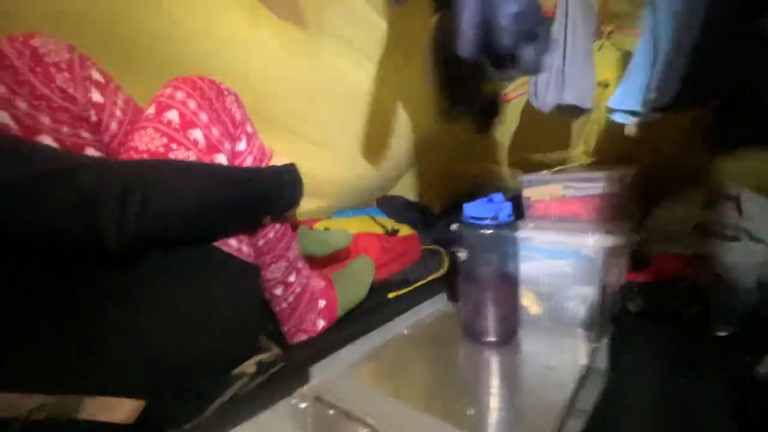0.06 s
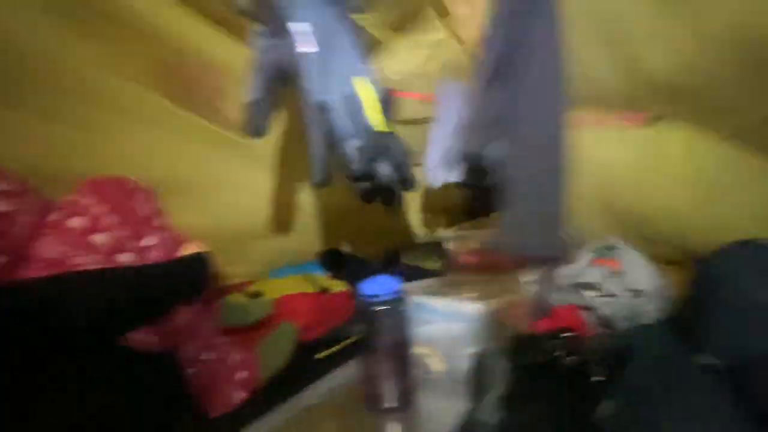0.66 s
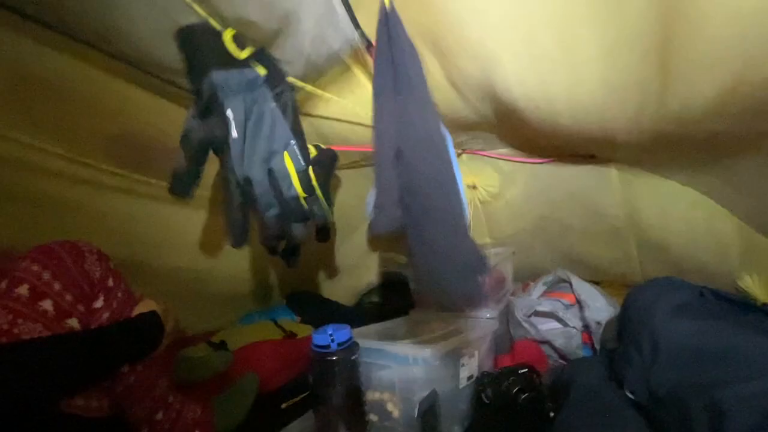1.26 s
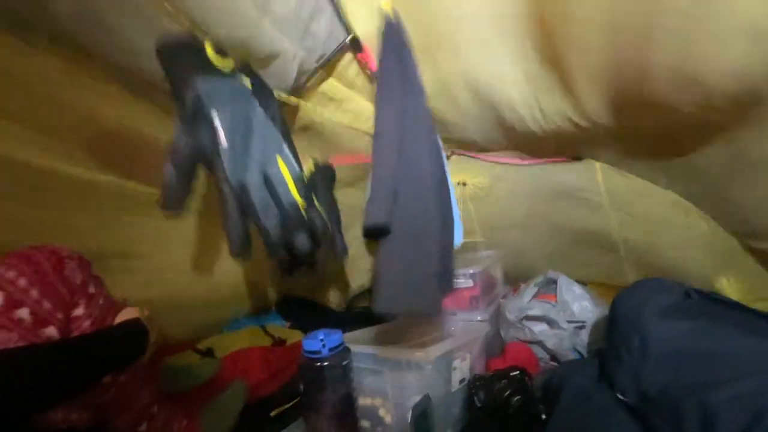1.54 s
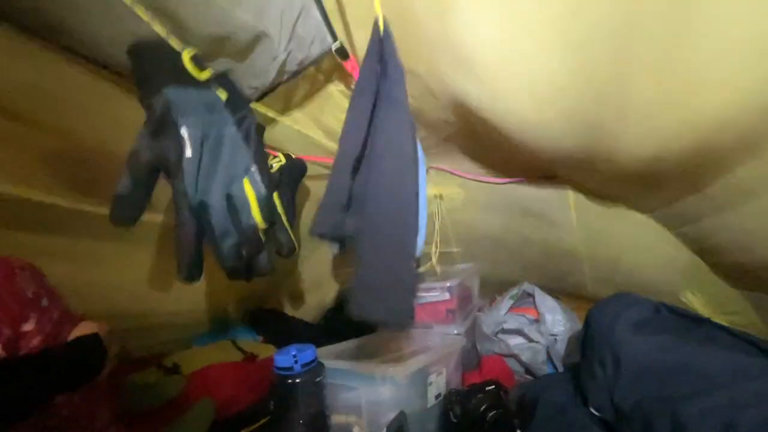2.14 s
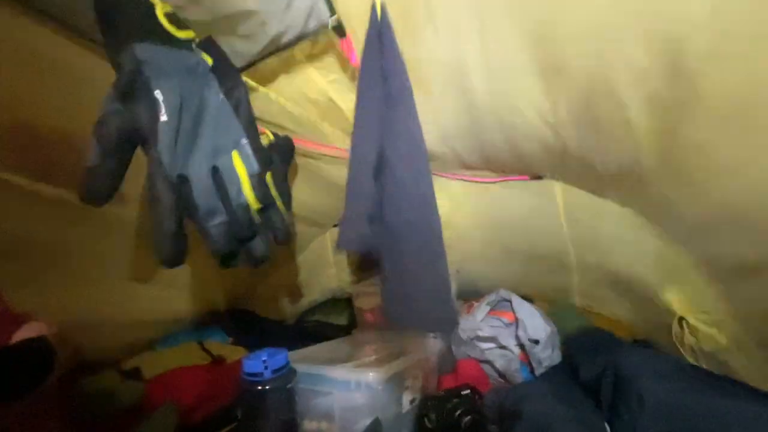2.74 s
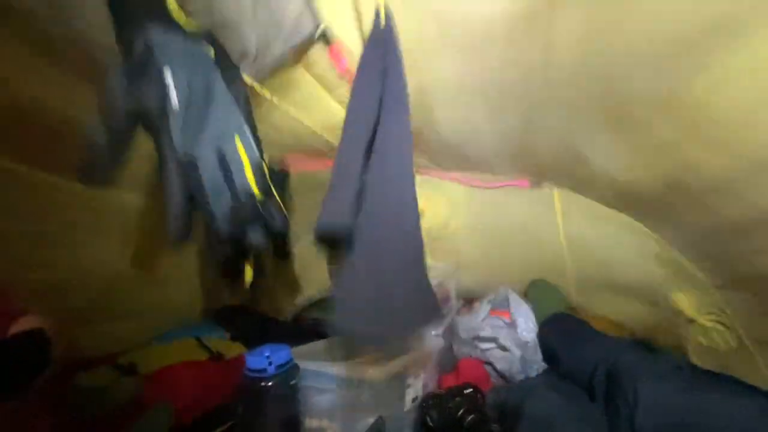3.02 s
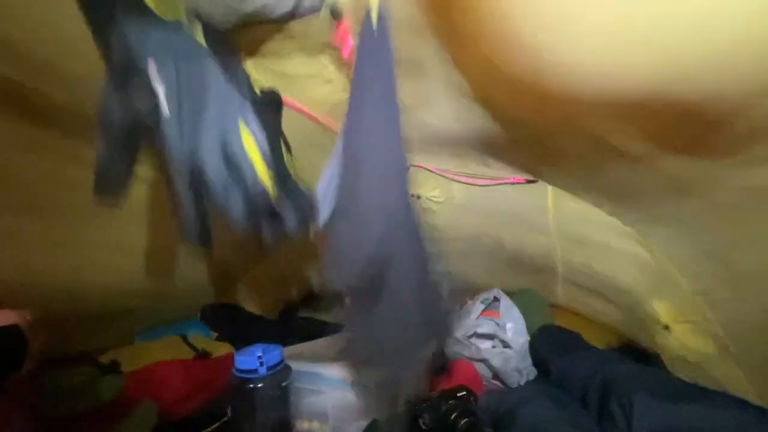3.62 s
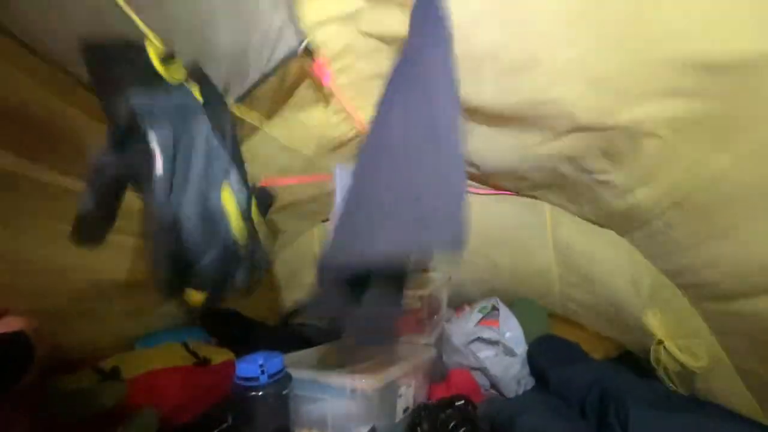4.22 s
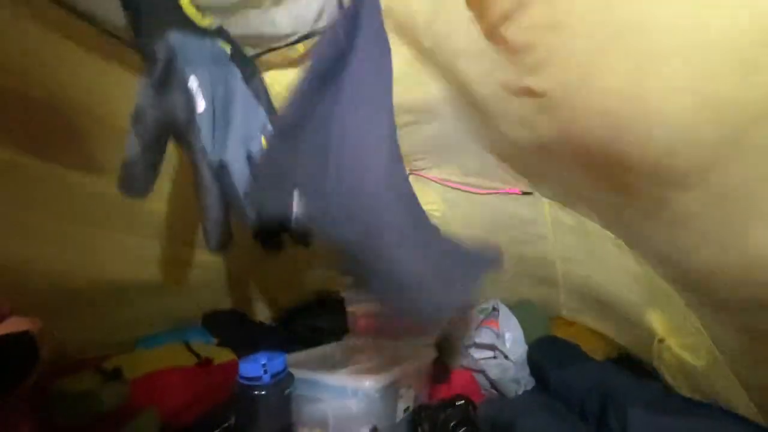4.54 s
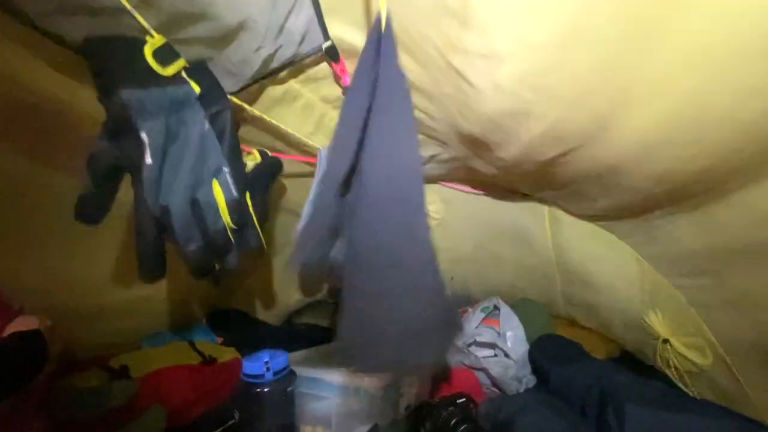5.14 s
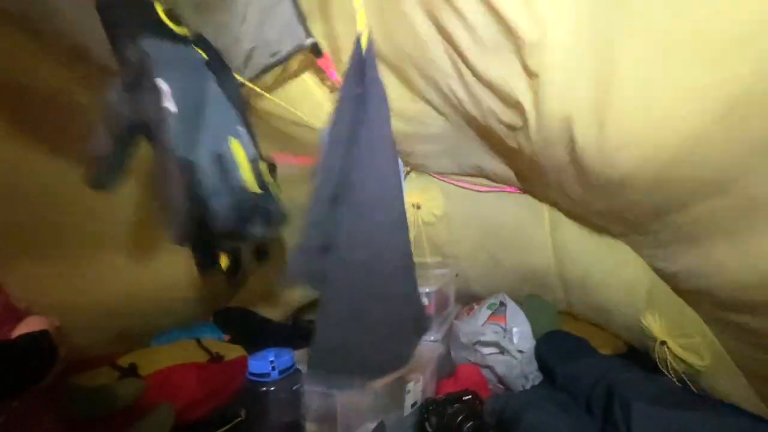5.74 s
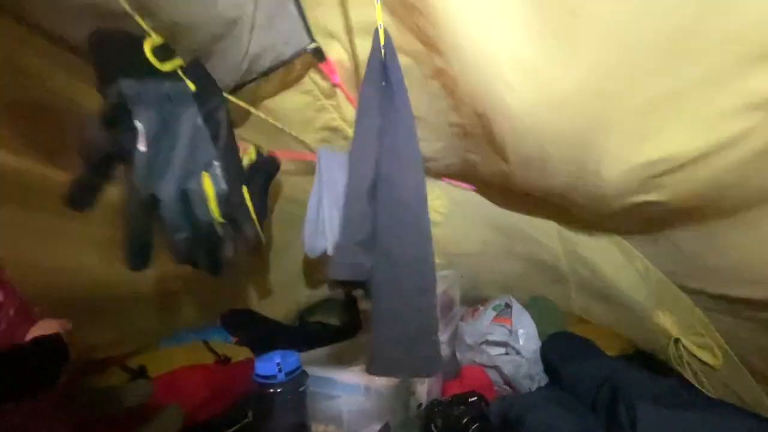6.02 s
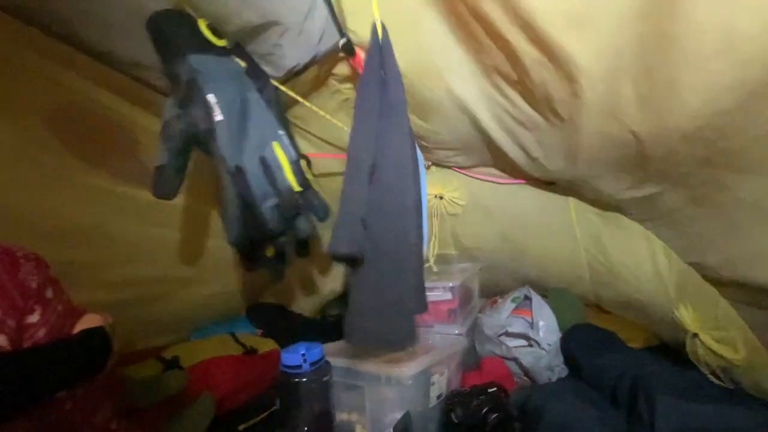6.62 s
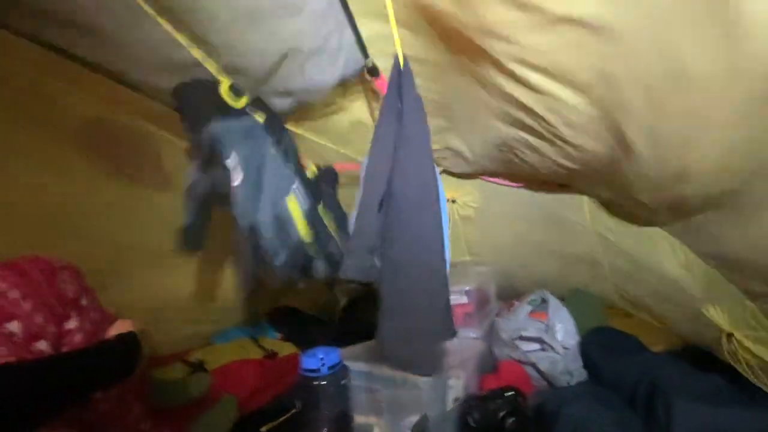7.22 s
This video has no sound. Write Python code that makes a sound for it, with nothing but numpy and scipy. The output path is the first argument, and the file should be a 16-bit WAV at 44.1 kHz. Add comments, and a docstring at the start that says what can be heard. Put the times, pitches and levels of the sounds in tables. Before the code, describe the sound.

Storm wind batters a tent from outside, its walls thumping, flapping and snapping over a deep rumble and a fine hiss of snow.

```python
"""Deep thumps, flaps and sharp snaps of tent cloth in a storm, heard from inside as the wind slowly eases.
A thump is a whole wall filling with air and stopping; a flap is a fold whipping over, and it cracks as it
jerks tight. Between them the walls billow, panels flutter, creases crinkle and pop, and fine blown snow
hisses over the fly (the outer sheet). Two microphones sit close to the wall."""
import sys
import numpy as np
from scipy import signal
from scipy.fft import rfft, irfft
from scipy.io import wavfile
from scipy.ndimage import uniform_filter1d

SR = 44100
rng = np.random.default_rng(int(sys.argv[2]) if len(sys.argv) > 2 else 0)


def persist_wave(psi):
    """Save psi, clipped to +-1, as 16-bit WAV."""
    counts = np.round(np.clip(psi, -1, 1) * 32767).astype(np.int16)
    wavfile.write(sys.argv[1], SR, np.atleast_2d(counts).T)


N = 321048
TIME = np.arange(N) / SR
BINS = np.fft.rfftfreq(N, 1 / SR)


def gain_of(db):
    """Turns decibels into a number to multiply a sound by."""
    return 10 ** (np.asarray(db) / 20)


def evened(x):
    """Scales x to an average (rms) size of 1."""
    return x / np.sqrt(np.mean(x ** 2) + 1e-20)


def curve(points):
    """Joins (frequency, value) points into one value for every frequency in BINS."""
    hz, value = np.transpose(points)
    return np.interp(np.log(BINS + 1), np.log(hz + 1), value)


def colour(x, tone):
    """Turns the lows and highs of x up or down by a tone table; the result has size 1."""
    return evened(irfft(rfft(x) * gain_of(curve(tone)), N))


def steadied(x, span):
    """Evens out swells slower than span seconds and keeps the fast texture."""
    power = irfft(rfft((x ** 2).mean(0)) * np.exp(-(BINS * span) ** 2), N)
    return x / np.sqrt(abs(power) + 1e-9)


def wander(hz):
    """A smooth random curve of size 1 that wobbles up to about hz times a second."""
    return evened(irfft(rfft(rng.standard_normal(N)) * np.exp(-(BINS / hz) ** 2), N))


def clicks(per_s, spread_db):
    """Random clicks of uneven size, each from its own direction."""
    size = gain_of(spread_db * np.minimum(rng.exponential(1, N), 4))
    return evened(rng.standard_normal((2, N)) * size * (rng.random(N) < per_s / SR))


def swell(t, rise, fall):
    """A rounded peak at t = 0 that fades away on both sides."""
    return 1 / np.cosh(np.clip(t / np.where(t < 0, rise, fall), -20, 20))


def bumps(rows, width):
    """A level curve in dB with a rounded rise (+) or dip (-) for each (time, change) row."""
    times, db = np.transpose(rows)
    marks = np.bincount(np.clip(np.round(times * SR).astype(int), 0, N - 1), db, N)
    t = np.arange(-SR // 10, SR // 10 + 1) / SR
    return signal.oaconvolve(marks, np.exp(-(t / width) ** 2), "same")


def patchy(x, depth_db, hz, span, size=512):
    """The tone flickers as the cloth changes shape; hz and span [s] set the size of the patches."""
    frames = dict(nperseg=size, noverlap=size * 3 // 4)
    spectra = signal.stft(x, **frames)[2]
    grid = spectra.shape[1:]
    across_pitch = np.fft.fftfreq(grid[0], SR / size)[:, None]
    across_time = np.fft.rfftfreq(grid[1], size / 4 / SR)
    blur = np.exp(-(across_pitch * hz) ** 2 - (across_time * span) ** 2)
    patches = evened(np.fft.irfft2(np.fft.rfft2(rng.standard_normal(grid)) * blur, grid))
    return evened(signal.istft(spectra * gain_of(depth_db * patches), **frames)[1][:, :N])


def play(rows, voice, size=8192):
    """Places one voice at the time and level of each row; further columns go to the voice."""
    t = (np.arange(size) - size // 2) / SR
    out = np.zeros((2, N + 2 * size))
    for time, db, *shape in rows:
        start = round(time * SR) + size // 2
        out[:, start:start + size] += gain_of(db) * voice(t, *shape)
    return out[:, size:size + N]


# How alike the two microphones sound: (frequency [Hz], likeness [0-1])
MIC_LIKENESS = [(80, .91), (300, .82), (900, .66), (1600, .6), (2200, .35), (3300, .5), (4000, .3),
                (4700, .58), (5900, .45), (6600, .76), (8800, .78), (10500, .3)]
# How far the left wave runs ahead of the right: (frequency [Hz], lead [radians])
LEFT_LEAD = [(20, 1.5), (70, -1.2), (130, -0.65), (290, -0.5), (430, -1.07), (850, -2.5), (1450, -2.5),
             (1950, -2.5), (2250, -6), (2750, -4.5), (3400, -4.5), (4400, 0.4), (5300, 1), (6100, 3),
             (6600, -2.5), (7100, 2.0), (8000, 3.5), (9300, 3.5), (10100, 8.5)]
# How loud the left is next to the right: (frequency [Hz], left minus right [dB])
LEFT_BALANCE = [(40, -2.5), (170, -4.6), (400, -2.6), (1000, -1), (2200, -2.3), (3500, -1.5), (6000, 0),
                (9200, -1), (10000, -10), (12000, -12)]
def microphones(sound):
    """Row one reaches both sides alike, row two in opposite ways; the case delays and shades the left."""
    likeness = np.clip(curve(MIC_LIKENESS), 0, 1)
    shared, opposed = rfft(sound) * np.sqrt([(1 + likeness) / 2, (1 - likeness) / 2])
    lean = gain_of(curve(LEFT_BALANCE))
    left = (shared + opposed) * lean * np.exp(1j * curve(LEFT_LEAD))
    right = shared - opposed
    return irfft(np.array([left, right]) * np.sqrt(2 / (1 + lean ** 2)), N)


# The wind's strength, easing as the squall passes: (time [s], relative level [dB])
WIND_STRENGTH = [(0.0, -40), (0.12, -39.5), (0.3, -38.5), (1.12, -37.5), (2.07, -40.5), (2.41, -38),
                 (2.64, -39.5), (2.82, -39.5), (3.44, -42), (3.71, -45), (4.54, -46), (5.01, -45),
                 (5.21, -49.5), (6.12, -48), (6.47, -49), (6.75, -47.5), (7.28, -48.5)]
# The wind lets go for a moment (-) or, now and then, pushes (+): (time [s], level change [dB])
WIND_LULLS = [(0.04, 1.5), (.14, -5), (0.3, -3), (0.39, -3), (1.22, -1.5), (1.97, -1.5), (3.01, -3),
              (3.3, -3.5), (3.41, -3.5), (4.06, -1.5), (4.27, -1.5), (5.01, -3.5), (5.24, -1), (5.36, -4.5),
              (5.52, -2.5), (5.61, 3), (5.99, -1.5), (6.32, -5), (6.925, -1), (7.27, -6)]
def wind(level_db, slope, lull_share=1):
    """Loudness of a layer: level_db in full wind, moving by slope dB for each dB of wind."""
    full_wind_db = -41
    wind_db = np.interp(TIME, *np.transpose(WIND_STRENGTH)) - full_wind_db
    return gain_of(level_db + slope * wind_db + lull_share * bumps(WIND_LULLS, width=.023))


# A loose panel shakes, then goes slack: (start [s], length [s], flutter level [dB], crinkle level [dB])
PANEL_FLURRIES = [(0.085, 0.069, -47, -23), (0.204, 0.027, -18.5, -25), (0.468, 0.015, -32, -26),
                  (0.492, 0.066, -19.5, -49), (0.623, 0.037, -22, -24), (0.791, 0.068, -20, -25.5),
                  (0.889, 0.14, -20.5, -25), (1.071, 0.098, -23.5, -25.5), (1.382, 0.03, -24, -25),
                  (1.471, 0.087, -19, -25), (1.609, 0.14, -21, -25), (2.038, 0.056, -17.5, -32),
                  (2.139, 0.047, -22, -25.5), (2.2, 0.032, -18.5, -23.5), (2.298, 0.074, -23.5, -24),
                  (2.4, 0.025, -36, -36), (2.634, 0.065, -16, -20), (2.757, 0.031, -13.5, -20.5),
                  (3.116, 0.095, -19, -21), (3.357, 0.04, -42, -23), (3.455, 0.082, -18, -17.5),
                  (3.56, 0.2, -19, -28), (3.79, 0.085, -23, -27.5), (3.877, 0.03, -19, -27),
                  (3.909, 0.049, -18, -18), (4.092, 0.13, -22.5, -30), (4.461, 0.03, -26, -31),
                  (4.578, 0.018, -26.5, -41), (4.764, 0.069, -25.5, -32), (4.9, 0.066, -22.5, -40),
                  (5.065, 0.085, -18.5, -26), (5.274, 0.054, -22, -26), (5.384, 0.033, -28, -40),
                  (5.44, 0.052, -29, -35.5), (5.637, 0.029, -19, -28), (5.781, 0.085, -23, -32.5),
                  (6.057, 0.069, -21.5, -37), (6.183, 0.021, -45, -38), (6.255, 0.024, -45, -36),
                  (6.542, 0.021, -45, -34), (6.6, 0.026, -42, -26.5), (6.66, 0.13, -27, -47),
                  (6.969, 0.18, -25, -35.5)]
def flurries():
    """Extra loudness for flutter and crinkle: each flurry starts quickly, holds and dies away."""
    power = np.zeros((2, N))
    for start, length, *levels_db in PANEL_FLURRIES:
        t = TIME - start
        held = np.clip(t, 0, length)
        shape = swell(t - held, rise=.004, fall=.014)
        power += np.outer(gain_of(levels_db), shape) ** 2
    return np.sqrt(power)


# Tone of snow blowing over the fly: (frequency [Hz], relative level [dB])
SNOW_TONE = [(300, -18), (1000, 5), (2200, 2), (3300, -4.5), (4300, -2), (5600, -4.5), (6150, -0.5),
             (6450, -3), (6900, -2.5), (8100, 1.5), (8450, 3.5), (9300, 0.5), (10200, -2.5), (12200, -24.5)]
def snow_hiss(creasing):
    """Countless fine grains sweep over the fly as a hiss; one thin, high band comes and goes."""
    level = np.hypot(wind(-35, slope=.95, lull_share=.2), gain_of(-18) * creasing)
    grains = patchy(clicks(per_s=16000, spread_db=-1), depth_db=2, hz=446, span=.071)
    hiss = colour(grains, SNOW_TONE) * gain_of(.7 * wander(hz=20))
    thin_band = evened(irfft(rfft(rng.standard_normal(N)) / (1 + ((BINS - 6480) / 170) ** 2), N))
    hiss[0] += gain_of(-20.5 + 3.5 * wander(hz=9)) * thin_band  # the row both microphones share
    return level * hiss


# Small creases that pop clearly: (time [s], relative level [dB])
CREASE_POPS = [(.111, -27), (.475, -32), (1.037, -27), (1.165, -30), (1.403, -29), (1.516, -32),
               (1.632, -28), (1.768, -27), (1.883, -30), (2.325, -31), (2.784, -32), (3.933, -32),
               (4.069, -33.5), (4.118, -35.5), (4.283, -36), (5.172, -32), (5.75, -39), (5.79, -37),
               (5.832, -35), (6.61, -39), (6.828, -42)]
# Tone of a pop: (frequency [Hz], relative level [dB])
POP_TONE = [(800, -20), (1800, 0), (2500, 3), (3400, -3), (4400, -2), (6000, -6), (9000, -11), (12000, -30)]
def crease_pops():
    """Small creases pop in tiny dry bursts: a few clear ones among many faint ones."""
    def pop(t):
        return rng.standard_normal((2, len(t))) * swell(t, rise=.0008, fall=.003)

    burst = pop((np.arange(1024) - 256) / SR)
    faint = signal.oaconvolve(clicks(per_s=45, spread_db=-3), burst, axes=1)[:, :N]
    pops = play(CREASE_POPS, pop) + wind(-55, slope=.8) * evened(faint)
    tone = evened(gain_of(curve(POP_TONE)))
    return irfft(rfft(pops) * tone, N)


# The fly slides on the inner tent: (time [s], relative level [dB], length [s])
FLY_SLIDES = [(0.11, -40, 0.0031), (0.127, -35, 0.013), (0.71, -33, 0.027), (2.167, -32, 0.012),
              (2.785, -40, 0.031), (3.191, -28, 0.0036), (3.222, -32.5, .012), (3.533, -28.5, 0.011),
              (3.735, -32, 0.007), (4.168, -31, 0.0068), (4.283, -36, 0.0077), (5.165, -40, 0.038),
              (5.475, -41, 0.018), (5.6, -43.5, .035), (5.777, -38, .01), (6.615, -42, 0.013),
              (7.064, -31.5, 0.0027), (7.15, -41.5, 0.048)]
# Tone of cloth rubbing on cloth: (frequency [Hz], relative level [dB])
RUB_TONE = [(500, -23), (2000, 0), (3000, 3), (5000, -1), (8500, 3.5), (10500, -4.5), (12500, -34)]
def fly_swishes():
    """One sheet rubs over the other with a noise that builds and stops."""
    def rub(t, length):
        return rng.standard_normal((2, len(t))) * swell(t, .98 * length, .58 * length)

    return gain_of(3) * irfft(rfft(play(FLY_SLIDES, rub)) * gain_of(curve(RUB_TONE)), N)


def folds(ripple, low_hz, high_hz, per_s, spread_db, cycles, count=28, size=1024):
    """Many folds buckle now and then, each ringing for a few cycles at its own pitch and place."""
    t = np.arange(size) / SR
    out = np.zeros((2, N))
    for hz in np.geomspace(low_hz, high_hz, count):
        starts = np.flatnonzero(rng.random(N) < per_s / count / SR)
        uneven_db = spread_db * np.minimum(rng.exponential(1, len(starts)), np.pi)
        strength = gain_of(uneven_db + 2 * ripple[starts])
        fade = strength[:, None] * (1 - np.exp(-2 * t * hz)) * np.exp(-t * hz / cycles)
        own_hz = hz * rng.uniform(.94, 1.06, (len(starts), 1))
        samples = (starts[:, None] + np.arange(size)).ravel()
        for row in out:
            rings = fade * np.cos(2 * np.pi * (own_hz * t + rng.random((len(starts), 1))))
            row += np.bincount(samples, rings.ravel(), N)[:N]
    return evened(out)


# Tone of tight creases: (frequency [Hz], relative level [dB])
CRINKLE_TONE = [(300, 11.5), (700, 4), (1000, -2), (1550, 1), (2000, -2.5), (2600, -8.5), (3200, -13.5),
                (5000, -27), (9000, -33), (13000, -62)]
def crinkle(ripple, creasing):
    """Ripples shake the tight creases, which rustle in small bursts and sink deeply in lulls."""
    bursts = gain_of(1.8 * wander(hz=15))
    level = np.hypot(wind(-33, slope=.78, lull_share=1.6) * bursts, creasing)
    specks = clicks(per_s=5000, spread_db=1) * gain_of(.8 * ripple)
    rustle = patchy(specks, depth_db=2.7, hz=450, span=.04)
    creases = folds(ripple, low_hz=800, high_hz=3200, per_s=560, spread_db=2.5, cycles=4)
    return level * steadied(colour(rustle + .52 * creases, CRINKLE_TONE), span=.09)


# Tone of wide panels: (frequency [Hz], relative level [dB])
FLUTTER_TONE = [(60, -40), (140, -7.5), (200, -7), (290, -2.5), (420, -5.5), (580, -3), (720, -9),
                (900, -17.5), (1500, -18), (4000, -100)]
def flutter(ripple, shaking):
    """Ripples shake the wide panels, which beat quickly with a low sound."""
    level = np.hypot(wind(-23.5, slope=.6), shaking)
    beating = clicks(per_s=2000, spread_db=1) * gain_of(1.9 * ripple)
    panels = folds(ripple, low_hz=170, high_hz=720, per_s=280, spread_db=1.5,
                   cycles=2.5, count=20, size=2560)
    return level * steadied(colour(beating + .3 * panels, FLUTTER_TONE), span=.08)


# Tone of slowly heaving walls: (frequency [Hz], relative level [dB])
BILLOW_TONE = [(15, -36), (30, -20), (45, -4), (68, 2), (100, -5.5), (150, -5), (210, -22.5), (400, -42),
               (900, -84)]
def billow(shaking):
    """The walls heave in the wind with a deep rumble that grows in each flurry."""
    level = np.hypot(wind(-19.6, slope=.55), gain_of(-4.5) * shaking)
    return level * steadied(colour(rng.standard_normal((2, N)), BILLOW_TONE), span=.23)


def bending_wave(t, hz, length, glide):
    """Short waves run ahead of long ones in the cloth, so the pitch falls, passing hz at t = 0."""
    pitch = hz * np.exp(-glide * np.tanh(t / length))
    turns = np.cumsum(pitch) / SR + rng.random()
    # a quarter turn between the rows places the sound a little to one side
    side = np.pi / 2 * np.array([[0], [rng.choice([-1, 1])]])
    return np.cos(2 * np.pi * turns + side)


# A whole wall fills and is stopped: (time [s], relative level [dB], pitch [Hz])
WALL_THUMPS = [(0.097, 3, 112.8), (0.181, -1.5, 91.6), (0.228, -1.5, 95.6), (0.386, 1, 78.3),
               (0.441, -2.5, 76.2), (0.495, 5.5, 87.8), (0.67, 5.5, 113.3), (0.761, 0, 76),
               (0.836, 1, 74.3), (0.955, 1.5, 88), (1.035, 0.5, 101.3), (1.087, -2.5, 107.4),
               (1.128, 7, 99.4), (1.281, 4.5, 90), (1.409, 3.0, 79), (1.456, 2, 77), (1.545, 2, 77.6),
               (1.697, 0, 91.4), (1.777, -1.0, 92.7), (1.894, 2.0, 93), (2.071, -2, 88), (2.163, -1.5, 85),
               (2.226, -3, 89), (2.351, 1, 80.3), (2.398, 2, 85.7), (2.436, 0, 81), (2.588, 3.5, 79),
               (2.689, 4, 81.7), (2.752, -8, 91.5), (2.807, 3.5, 96.3), (2.94, -2, 85.6),
               (2.982, -0.5, 98.4), (3.127, -4, 83.6), (3.205, 0, 86), (3.258, -3.5, 88), (3.3, -4, 65.7),
               (3.48, -7, 112), (3.546, -6, 91.4), (3.589, 2, 87.5), (3.7, -3.0, 96.6), (3.779, -1.0, 91.3),
               (3.872, -2, 86.4), (3.98, -2.0, 90.8), (4.036, -12, 109), (4.112, 0, 91.8),
               (4.293, -9, 76.4), (4.375, -6, 95), (4.415, -3, 86), (4.47, -1.0, 88), (4.556, -4.5, 94.5),
               (4.646, -2, 98.7), (4.694, -7, 88.3), (4.799, -8, 79), (4.859, -6, 98), (4.959, -2.5, 78.6),
               (5.038, -8, 88), (5.092, -6, 93), (5.129, -5, 97.6), (5.177, 2, 92.3), (5.422, -6, 84),
               (5.565, -4, 67.7), (5.681, -5, 72.8), (5.819, -11, 97.5), (5.896, -2, 78.4),
               (5.947, -7.0, 71), (6.09, -5, 75.4), (6.171, -12, 73), (6.246, -4.5, 82), (6.382, -4, 85.7),
               (6.483, -9, 103), (6.649, -3, 99.3), (6.696, -3, 84.4), (6.738, -7, 92), (6.805, -7.0, 77.4),
               (6.896, -13, 106), (7.008, -3.5, 84), (7.053, -12, 96.4), (7.136, -3, 73.8),
               (7.213, -7.5, 85)]
def wall_thumps():
    """Each thump is one or two deep swings of a wall."""
    def thump(t, hz, length=.014):
        return bending_wave(t, hz, length, glide=.2418) * swell(t, .4 * length, .42 * length)

    return gain_of(-8) * play(WALL_THUMPS, thump)


def after_thumps(rise_db=2, delay_s=.077):
    """A loudness curve that rises briefly just after each thump."""
    return gain_of(bumps([(time + delay_s, rise_db) for time, *_ in WALL_THUMPS], width=.0098))


def whip(t, hz, length):
    """A fold whips over, then the panel around it gives a softer, lower push."""
    fold = bending_wave(t, hz, length, glide=.4) * swell(t, .33 * length, .68 * length)
    push = bending_wave(t, .45 * hz, length=.007, glide=.41) * swell(t - .002, .0023, .0032)
    return fold + gain_of(-4.5) * push


def crack(t, hz, top_hz, length):
    """Cloth jerks tight: a ragged, falling crack in a brief rustle. Slack dulls it above top_hz."""
    freq = np.fft.rfftfreq(len(t), 1 / SR) + 1
    steepness = np.where(freq < hz, .5, 1)
    band = (1 + (steepness * (freq / hz - hz / freq)) ** 2) ** -.78
    band /= np.sqrt(1 + (freq / top_hz) ** 12)
    jerks_db = 3 * evened(uniform_filter1d(rng.standard_normal(len(t)), round(.0015 * SR)))
    ragged = evened(irfft(rfft(rng.standard_normal((2, len(t))) * gain_of(jerks_db)) * band))
    snap = .56 * bending_wave(t, hz, length, glide=.25) + .38 * ragged
    rustle = gain_of(-16.5) * ragged * swell(t, rise=.004, fall=.008)
    return snap * swell(t, .18 * length, .68 * length) + rustle


# Folds that whip over and crack: (time [s], relative whip level [dB], whip pitch [Hz],
# relative crack level [dB], crack pitch [Hz], top edge of the crack [Hz], whip length [s])
FOLD_FLAPS = [(.053, -15, 400, -19, 1500, 2400, .004), (.111, -11, 480, -8, 1900, 3600, .0018),
              (.22, -6, 340, -22, 1400, 2400, .003), (.348, -13, 350, -28, 1400, 2400, .004),
              (.486, -6, 350, -17, 1330, 2800, .003), (.532, -8, 520, -15, 1100, 1800, .003),
              (.812, -5, 340, -24, 1400, 2400, .004), (.949, -9, 400, -26, 1400, 2200, .005),
              (.957, -8.5, 480, -16, 1270, 2200, .003), (1.033, -10, 500, -16, 1650, 2400, .004),
              (1.134, -9, 350, -10.5, 1250, 2000, .004), (1.168, -9, 350, -20, 1600, 3500, .004),
              (1.269, -5, 310, -14, 1560, 1900, .004), (1.358, -14, 400, -17, 1400, 2400, .004),
              (1.443, -4.5, 280, -15, 1280, 2400, .004), (1.477, -8, 320, -16, 1250, 2000, .004),
              (1.531, -10, 380, -13.5, 1450, 2400, .004), (1.632, -7.5, 610, -12.5, 1300, 3300, .0035),
              (1.653, -13, 450, -11, 1500, 2600, .003), (1.692, -7.5, 560, -11, 1600, 2700, .0035),
              (1.727, -8, 400, -17, 1400, 2400, .003), (1.759, -8, 480, -10, 1700, 3200, .0025),
              (1.768, -6, 340, -9.5, 1650, 3000, .0035), (1.839, -14, 380, -28, 1400, 2400, .004),
              (1.884, -8, 520, -20, 1400, 3500, .004), (1.936, -11, 350, -22, 1400, 2400, .004),
              (2.017, -4, 350, -22, 1400, 2400, .003), (2.075, -4.5, 520, -24, 1400, 2000, .003),
              (2.115, -16, 450, -11.5, 2250, 2700, .004), (2.168, -5.5, 580, -11, 1550, 2300, .003),
              (2.215, -11, 400, -14, 1400, 2400, .004), (2.232, -7, 350, -24, 1400, 2400, .004),
              (2.331, -5, 350, -22, 1400, 2400, .004), (2.345, -12, 400, -14, 1400, 2400, .004),
              (2.386, -2, 480, -22, 1400, 2400, .0035), (2.455, -12, 380, -26, 1400, 2400, .004),
              (2.579, -12, 350, -27, 1400, 2400, .004), (2.64, -3, 380, -20, 1250, 2600, .003),
              (2.647, -3, 380, -15, 1300, 2600, .004), (2.654, -5, 350, -14, 1400, 2800, .004),
              (2.666, -14, 450, -12, 1500, 2200, .003), (2.678, -10, 560, 2, 1130, 1900, .0035),
              (2.682, -14, 450, -3, 2100, 3700, .0025), (2.797, -4, 370, -13, 1350, 2800, .005),
              (2.853, -5.5, 450, -13, 1150, 2000, .005), (2.977, -8.5, 500, -11, 1150, 1800, .003),
              (3.135, -7, 400, -16, 1200, 2200, .005), (3.162, -6, 360, -20, 1400, 2400, .004),
              (3.189, -8, 400, -12, 1600, 2100, .003), (3.246, -8, 350, -24, 1400, 2200, .004),
              (3.346, -13, 350, -28, 1400, 2400, .004), (3.463, -2, 380, -14, 1250, 2400, .003),
              (3.47, -10, 440, -9.5, 1400, 2400, .004), (3.536, -6, 480, -9, 1200, 2200, .005),
              (3.574, -8, 480, -17, 1170, 2000, .003), (3.6, -8, 350, -24, 1400, 2400, .004),
              (3.637, -16, 400, -17, 1400, 2400, .004), (3.7, -12, 400, -10.5, 1400, 2200, .003),
              (3.734, -4, 450, -10, 1700, 2600, .003), (3.7615, -4.5, 600, -5, 1200, 1650, .0027),
              (3.796, -15, 400, -16, 1500, 2200, .003), (3.884, -11, 420, -12.5, 1600, 2300, .004),
              (3.923, -14, 450, -14, 1900, 2600, .003), (3.935, -13, 420, -14, 1800, 2800, .003),
              (3.949, -13, 480, -14, 1600, 2600, .003), (3.97, -2, 480, -15, 1450, 2900, .004),
              (4.132, -11, 350, -28, 1400, 2400, .004), (4.168, -7, 420, -17, 1500, 3500, .004),
              (4.212, -10, 350, -25, 1300, 2000, .004), (4.28, -12, 450, -21, 1400, 2200, .0045),
              (4.603, -13, 350, -30, 1400, 2400, .004), (4.692, -18, 400, -22, 1400, 2400, .004),
              (4.791, -9, 410, -17, 2100, 3200, .005), (5.085, -11, 400, -20, 1300, 2200, .004),
              (5.173, -2, 320, -6.5, 1350, 2200, .004), (5.23, -20, 450, -19, 1100, 1500, .004),
              (5.279, -13, 550, -20, 1400, 2400, .004), (5.321, -10, 450, -20, 1220, 1700, .004),
              (5.439, -19, 400, -21, 1500, 2500, .004), (5.69, -13, 330, -30, 1400, 2400, .004),
              (5.802, -11, 350, -21, 1400, 2200, .003), (5.874, -11, 350, -25, 1300, 2200, .004),
              (5.832, -9, 340, -17, 1450, 2800, .005), (6.083, -13, 340, -21, 1310, 2800, .004),
              (6.148, -10, 320, -23.5, 1800, 2700, .005), (6.306, -17, 350, -34, 1400, 2400, .004),
              (6.465, -20, 400, -21.5, 1650, 2600, .005), (6.532, -15, 550, -25, 1340, 2400, .003),
              (6.556, -22, 400, -24, 1500, 2400, .003), (6.691, -13, 350, -25, 1400, 2400, .004),
              (6.8, -10, 300, -32, 1400, 2400, .004), (6.891, -8, 330, -27, 1000, 1600, .003),
              (7.006, -13, 340, -30, 1200, 2200, .004), (7.115, -10, 360, -30, 1400, 2400, .004),
              (7.261, -15, 350, -36, 1400, 2400, .004)]
def fold_flaps(crack_lead_s=.001):
    """Each flap is a low whip with a shorter, brighter crack just ahead of it."""
    whips, cracks = [], []
    for time, whip_db, whip_hz, crack_db, crack_hz, top_hz, length in FOLD_FLAPS:
        whips.append((time, whip_db, whip_hz, length))
        cracks.append((time - crack_lead_s, crack_db, crack_hz, top_hz, .75 * length))
    return gain_of(-2.2) * (play(whips, whip) + play(cracks, crack))


def before_flaps(dip_db=-2.2, lead_s=.007):
    """A loudness curve that dips as the cloth hangs loose for an instant before each flap."""
    return gain_of(bumps([(time - lead_s, dip_db) for time, *_ in FOLD_FLAPS], width=lead_s))


def scene():
    """Snow and restless cloth all around the two microphones."""
    shaking, creasing = flurries()
    ripple = wander(hz=41.3)  # the same ripples run through creases and panels
    background = snow_hiss(creasing) + crease_pops() + fly_swishes()
    cloth = before_flaps() * (crinkle(ripple, creasing) + flutter(ripple, shaking))
    rumble = after_thumps() * billow(shaking)
    return microphones(background + cloth + rumble + wall_thumps() + fold_flaps())


def record(dry):
    """Cuts the deepest bass, gently rounds the tallest peaks and removes the highest treble."""
    x = signal.sosfilt(signal.butter(2, 24, "highpass", fs=SR, output="sos"), dry)
    knee, headroom, top_hz = .65, .3, 12600
    clipped = np.clip(x, -knee, knee)
    rounded = clipped + headroom * np.tanh((x - clipped) / headroom)
    treble_cut = signal.firwin(255, top_hz, window=("kaiser", 8), fs=SR)
    return signal.oaconvolve(rounded, treble_cut[None], "same")


dry = scene()
out = record(dry)
persist_wave(out)
```